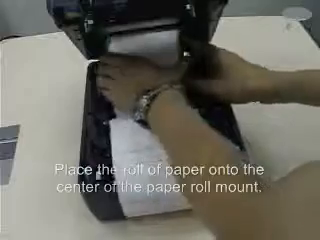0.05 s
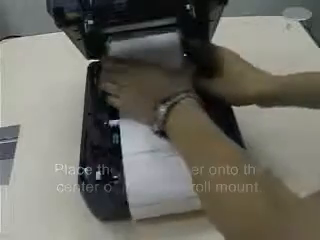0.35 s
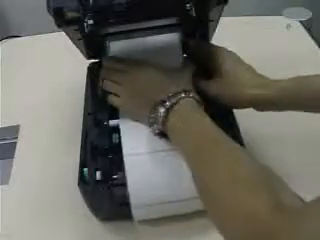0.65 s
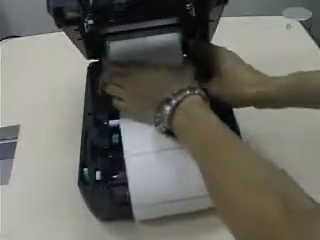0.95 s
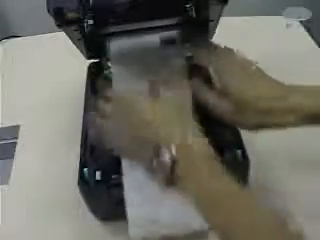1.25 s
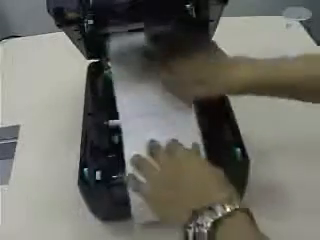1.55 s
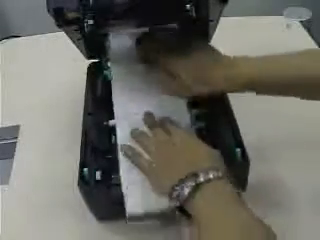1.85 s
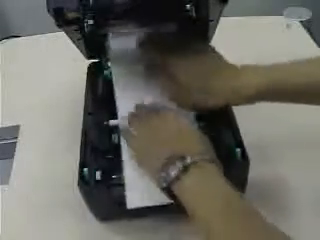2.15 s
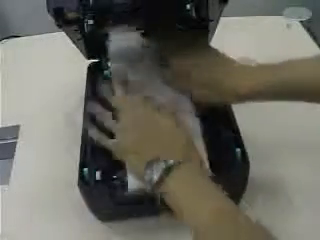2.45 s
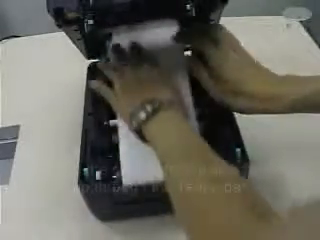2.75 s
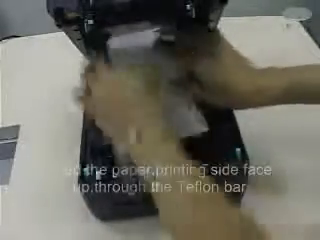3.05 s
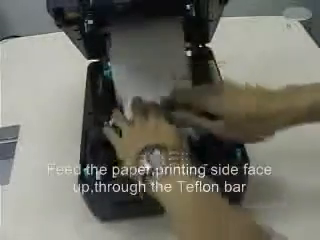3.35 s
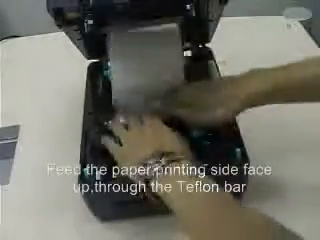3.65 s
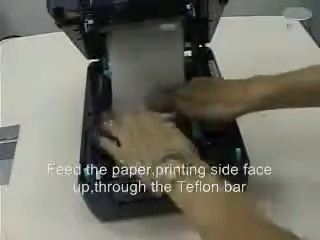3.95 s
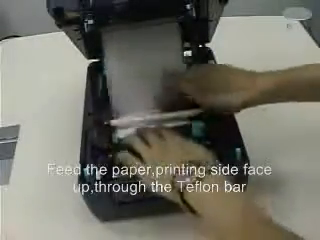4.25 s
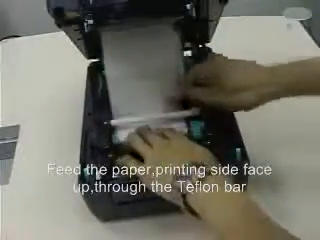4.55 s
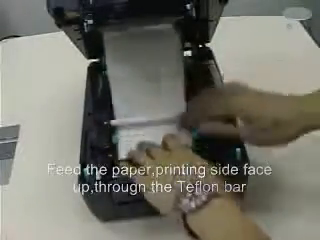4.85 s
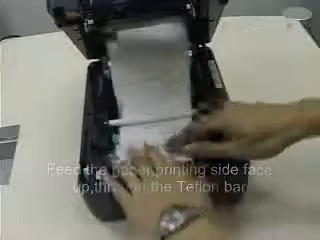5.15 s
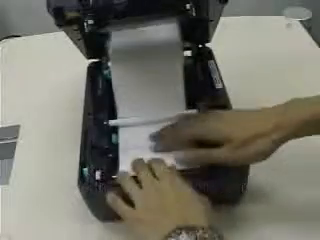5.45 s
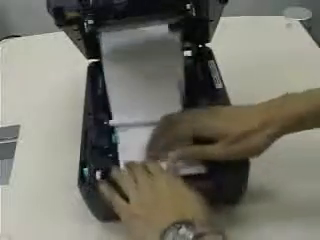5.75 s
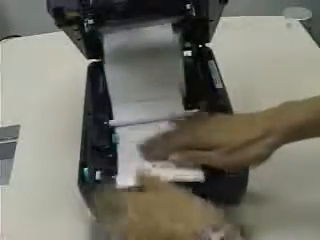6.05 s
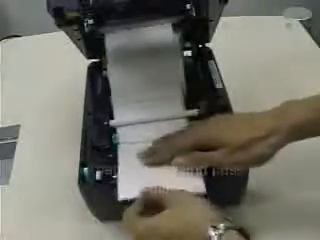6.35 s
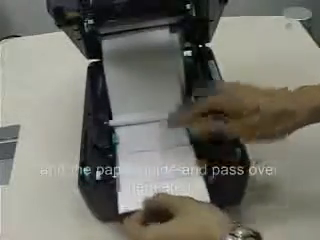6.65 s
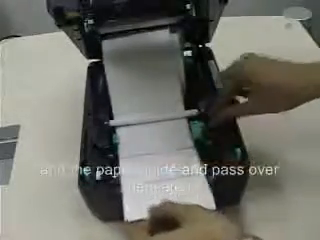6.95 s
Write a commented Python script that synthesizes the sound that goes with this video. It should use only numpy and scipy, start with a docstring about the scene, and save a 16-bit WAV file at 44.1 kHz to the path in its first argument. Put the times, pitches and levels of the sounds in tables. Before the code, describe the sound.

A paper roll clacks into a plastic printer, then paper rustles and slides amid light clicks and hollow knocks.

```python
"""Loading a label printer

At a desk in a small, live room, heard from a camera's two close microphones. A label roll drops into
the printer's plastic mount, which clacks and thumps the desk. Hands pull the paper strip out and feed
it under a bar: fingers and guides click on the hollow case, and the sliding paper rustles.
The room rings behind it all, over ventilation noise."""
import sys
import numpy as np
from scipy import signal
from scipy.fft import rfft, irfft, next_fast_len
from scipy.io import wavfile
from scipy.ndimage import uniform_filter1d

SR = 44100
rng = np.random.default_rng(int(sys.argv[2]) if len(sys.argv) > 2 else 0)


def transcribe(signal):
    """Save signal, clipped to [-1, 1], as a 16-bit WAV file at the path in sys.argv[1]."""
    frames = np.atleast_2d(signal).T
    limited = np.clip(frames, -1, 1)
    pcm = np.round(limited * 32767).astype(np.int16)
    wavfile.write(sys.argv[1], SR, pcm)


N = 308700
TIME = np.arange(N) / SR
BLOW_SAMPLES = SR / 100  # levels of single sounds refer to 10 ms

# The roll lands, rebounds and settles, close to the microphones.
# Each row: start in seconds, level in dB, treble offset in dB, desk thump level in dB.
ROLL_BLOWS = [(.4070, -17.5, -2, -26), (0.4082, -13.5, -5.5, -47.5), (0.428, -27, -2.5, -55.5),
              (0.4395, -10, -17, -18.5), (0.4487, -26, -4.5, -32.5), (0.4609, -19.5, -19.5, -31)]
# The plastic mount. Each row: mode frequency in Hz, relative level in dB, time to fall 60 dB in seconds.
MOUNT_MODES = [(828, -2, 0.019), (1070, 4, 0.0092), (1076, -4.5, 0.14), (1183, -15, .1), (1346, -2, 0.0037),
               (2500, -22, 0.0037), (3530, -3, 0.0052), (3240, -18, 0.028), (5400, -11, 0.00081),
               (6600, -3, 0.0052)]
# The desk under the printer. Each row: mode frequency in Hz, relative level in dB, t60 in seconds.
DESK_MODES = [(60, -9, .12), (83.4, -6, 0.11), (109, 0, 0.19), (148, -2, 0.53), (267, -4, 0.071),
              (330, -3.5, 0.21)]
# The midrange crack of a contact, heard close. Each row: frequency in Hz, relative level in dB.
CRACK_SPECTRUM = [(300, -10), (900, -2), (1500, 6.5), (2900, 5.5), (4200, -11), (9000, -39.5)]
# The bright snap at the mount. Each row: frequency in Hz, relative level in dB.
SNAP_SPECTRUM = [(1500, -13), (3000, -10), (3700, 6.5), (4900, -7), (6800, -3.5), (7800, -7.5), (9500, -41),
                 (11000, -47)]


def roll_drop(case, treble_hz=2000, pan_db=2):
    """The roll clacks into its mount; hard blows wake the high modes, heavy ones thump the desk."""
    out, desk = np.zeros((2, N)), body(DESK_MODES)
    low = body(MOUNT_MODES, below_hz=treble_hz)
    high = body(MOUNT_MODES, from_hz=treble_hz)
    for s, db, treble_db, thump_db in ROLL_BLOWS:
        add(out, s, low, db, pan_db)
        add(out, s - .0004, high, db + treble_db - 3, pan_db=-1)
        add(out, s - .001, colour(contact(.0053), CRACK_SPECTRUM)[0], db + treble_db / 2 - 7)
        add(out, s - .001, colour(contact(.003), SNAP_SPECTRUM)[0], db + treble_db - 6)
        add(out, s, case, db - 13, pan_db)
        add(out, s, desk, thump_db, pan_db=-.8)
    return out


# The hollow case on the desk. Each row: mode frequency in Hz, relative level in dB, t60 in seconds.
CASE_MODES = [(323.4, -4.5, 0.38), (352, -10.5, 0.14), (396.9, -1.5, 0.51), (439, -5, 0.056),
              (480.6, -5.5, 0.26), (508, -0.5, 0.13), (570, -1, 0.017), (617.3, -2.5, 0.14),
              (681, -3.5, 0.041), (817, -2, 0.036), (1002, -7.5, 0.046), (1266, -10, 0.098),
              (1475, -12.5, 0.038)]
# How much of a push gets into the case. Each row: frequency in Hz, relative gain in dB.
CASE_UPTAKE = [(60, -25), (200, -5), (320, 2.5), (9000, 0.5)]


def hollow_case():
    """The case rings in many modes but answers little to the slowest part of a push."""
    return unit(colour(body(CASE_MODES), CASE_UPTAKE)[0])


# Fingers, guides and paper edges strike the case, just left of centre. Each row: start in seconds,
# contact length in seconds, ring in Hz, then relative levels in dB of ring and crack, tick, case knock.
CASE_CONTACTS = [(0.067, 0.0019, 4280, -38.5, -29, -57), (1.161, .0022, 1160, -47.5, -53, -55),
                 (1.182, 0.018, 1104, -36, -46.5, -35), (1.229, 0.0052, 1310, -37, -57.5, -55.5),
                 (1.2378, .003, 2040, -29.5, -39, -45), (1.8595, 0.0046, 1400, -30, -27.5, -30),
                 (2.19, 0.0044, 1250, -37, -41.5, -30), (2.216, .002, 1830, -37.5, -43.5, -33.5),
                 (2.269, 0.0041, 2980, -34, -35, -58), (2.745, 0.0053, 2100, -41.5, -48, -55.5),
                 (2.819, .003, 7850, -46, -43, -55), (2.831, .0089, 2420, -41.5, -39.5, -56),
                 (3.038, 0.0016, 7840, -46, -42, -52), (3.077, 0.0021, 1580, -41, -62, -38),
                 (3.12, 0.0019, 2340, -45.5, -60, -28.5), (3.201, .009, 1990, -30.5, -32, -36.5),
                 (3.2074, .004, 1880, -28.5, -35.5, -24), (3.285, 0.007, 2380, -42.5, -34, -70),
                 (3.3298, 0.0026, 2410, -29, -36.5, -45), (3.3575, 0.0014, 1900, -40, -39, -42),
                 (3.4927, 0.0026, 2020, -33, -44, -30), (3.511, 0.007, 1413, -24, -37, -18.5),
                 (3.5187, 0.0036, 920, -28.5, -43.5, -33.5), (3.5897, 0.0012, 1670, -33, -38.5, -25),
                 (4.282, 0.007, 2250, -46.5, -50, -53), (4.401, .0025, 2900, -54, -52, -58),
                 (4.46, .0066, 2080, -39.5, -34, -29), (4.5492, .003, 2440, -45, -35, -35),
                 (4.643, 0.0044, 2340, -34.5, -30.5, -35), (4.7213, .003, 900, -37.5, -32.5, -35.5),
                 (4.905, 0.0019, 1970, -55, -45, -47.5), (5.03, 0.012, 1930, -31.5, -42.5, -32.5),
                 (5.0625, 0.011, 1346, -23.5, -36.5, -21.5), (5.076, 0.0048, 916, -28.5, -50, -18),
                 (5.185, 0.007, 4960, -29, -25, -24.5), (5.2472, .0028, 2020, -32, -37.5, -29),
                 (5.268, .002, 5700, -31, -28, -49), (5.349, 0.0045, 2420, -45.5, -35, -35.5),
                 (5.3826, 0.0012, 3700, -30, -31, -37), (5.388, 0.0094, 3940, -36.5, -31.5, -47),
                 (5.4182, 0.00072, 5200, -36, -33, -30), (5.628, .0049, 2740, -47, -53.5, -33.5),
                 (5.8016, 0.0039, 930, -43, -38.5, -31.5), (6.009, .0011, 6930, -52, -51, -57),
                 (6.049, 0.0013, 1430, -45, -50, -42), (6.06, .008, 990, -50, -47, -29),
                 (6.0917, 0.00082, 4600, -38.5, -28, -55), (6.2143, 0.0046, 1740, -43.5, -43, -42),
                 (6.7143, 0.00065, 4160, -44, -41, -44.5)]
# A small, sharp tick near the microphones. Each row: frequency in Hz, relative level in dB.
TICK_SPECTRUM = [(1500, -11), (3000, -6), (3900, -1), (6500, -1.5), (8000, -4.5), (9500, -16.5),
                 (11000, -33)]


def clicks(case, ring_cycles=17, lead_s=.0004, pan_db=1.6):
    """Each contact cracks, rings a small plastic part for a few cycles and knocks on the case."""
    rings, cracks, ticks, knocks = np.zeros((4, 2, N))
    for s, length, hz, db, tick_db, knock_db in CASE_CONTACTS:
        touch = contact(length)
        part = ring(hz, ring_cycles / hz, size=512)
        add(rings, s - lead_s, unit(np.convolve(touch, part)), db + 1, pan_db)
        add(cracks, s - lead_s, touch, db - 3, pan_db)
        add(ticks, s - lead_s, contact(length), tick_db - 3, pan_db / 2)
        add(knocks, s, unit(through(touch, case)[0]), knock_db - 1, pan_db)
    return rings + colour(cracks, CRACK_SPECTRUM) + colour(ticks, TICK_SPECTRUM) + knocks


# The hollow ring of the heavier knocks, a little toward the left microphone.
# Each row: start in seconds, pitch in Hz, relative level in dB.
CASE_THUDS = [(1.2417, 557, -31), (3.209, 519, -30), (3.404, 394, -37), (3.5155, 534, -22.5),
              (3.777, 520, -31), (4.464, 352, -33.5), (5.0655, 593, -24), (5.0752, 530, -23),
              (5.348, 408, -26.5), (5.52, 393, -35), (6.061, 823, -33.5), (6.105, 336, -30.5)]


def thuds(ring_cycles=60):
    """The heavier knocks also ring the case with one hollow note; lower notes last longer."""
    out = np.zeros((2, N))
    for s, hz, db in CASE_THUDS:
        add(out, s, ring(hz, ring_cycles / hz), db, pan_db=2.5)
    return colour(out, CASE_UPTAKE)


# Hands slide the paper through the printer. Each row: middle of the swell in seconds, time from there
# to the fade in seconds, then relative levels in dB of rustle, edge hiss, drag on the case.
HAND_STROKES = [(0, 0.01, -45.5, -45.5, -40), (.06, 0.42, -55, -61, -65), (1.196, 0.047, -42.5, -48, -39.5),
                (1.488, 0.077, -39, -41.5, -52), (1.563, .09, -40, -42, -54), (1.765, 0.13, -49, -49, -63),
                (1.85, 0.11, -39, -39.5, -46), (2.09, 0.13, -49, -54.5, -59), (2.2, 0.091, -41, -46, -51),
                (2.298, 0.077, -42, -44, -54), (2.433, 0.016, -39.5, -45, -59), (2.536, .05, -60, -52, -62),
                (2.709, 0.24, -46.5, -46.5, -50), (2.981, 0.16, -42.5, -44, -44),
                (3.13, 0.098, -39.5, -48.5, -32.5), (3.307, 0.13, -44, -50, -36),
                (3.495, .13, -38, -46.5, -35), (3.71, 0.058, -36, -40.5, -36.5),
                (3.84, 0.072, -59, -65, -44.5), (3.94, 0.13, -49.5, -53.5, -58),
                (4.164, 0.5, -55, -59.5, -56.5), (4.463, 0.068, -40, -48, -35),
                (4.69, 0.072, -49, -47, -40.5), (4.824, 0.29, -50.5, -54, -48.5),
                (5.079, 0.079, -35, -52.5, -36), (5.184, 0.23, -39.5, -44.5, -37.5),
                (5.484, 0.14, -51, -54.5, -47.5), (5.797, 0.084, -40.5, -45.5, -37),
                (6.076, 0.034, -38.5, -37.5, -29), (6.206, 0.24, -52.5, -55.5, -45.5),
                (6.499, 0.025, -45, -45.5, -37), (6.612, .06, -51.5, -56.5, -45.5),
                (6.791, 0.038, -53.5, -53.5, -53)]


def stroke_levels(attack_s=.1, sag_db_per_s=7.5, release_s=.057):
    """Rustle, hiss and drag over time: each stroke gathers speed, slackens slightly and dies away."""
    power = np.zeros((3, N))
    for s, length, *levels_db in HAND_STROKES:
        i = max(int((s - attack_s / 2) * SR), 0)
        t = TIME[i:i + SR] - s
        attack = np.sin(np.pi / 2 * np.clip(t / attack_s + .5, 0, 1)) ** 2
        release = np.exp(-np.maximum(t - length, 0) / release_s)
        envelope = attack * undb(-sag_db_per_s * t) * release
        power[:, i:i + len(t)] += np.outer(undb(levels_db), envelope) ** 2
    return np.sqrt(power)


# The face of the strip, heard close. Each row: frequency in Hz, relative level in dB.
RUSTLE_SPECTRUM = [(200, -22), (600, -4.5), (1000, 1.5), (1500, 2.5), (2100, 2), (3000, -2), (4500, -10.5),
                   (9000, -37.5)]
# Its edge, equal in both microphones. Each row: frequency in Hz, relative level in dB.
EDGE_SPECTRUM = [(1200, -22), (2800, -1.5), (4000, 0.5), (5500, 0.5), (7000, -1.5), (8500, -3.5),
                 (10000, -20), (11000, -36.5)]
# The low rub of hands at the printer. Each row: frequency in Hz, relative level in dB.
RUB_SPECTRUM = [(40, -47.5), (90, -17), (190, -7), (330, 2.5), (520, 1.5), (750, -7.5), (1000, -6.5),
                (2000, -41)]


def sliding_paper(case, jerk_db=3):
    """The strip slides in small jerks: it rustles, its edge hisses, and the drag rumbles in the case."""
    rustle, hiss, drag = stroke_levels() * undb(jerk_db * np.tanh(wander(70)))
    paper = colour(rustle * fibres(per_s=1200, spread_db=5.5, smooth_db=4.5), RUSTLE_SPECTRUM)
    edge = colour(hiss * fibres(per_s=2200, spread_db=2.5, smooth_db=.5), EDGE_SPECTRUM)
    rumble = undb(-4) * through(drag * fibres(per_s=300, spread_db=3, smooth_db=-6.5), case)
    hands = undb(-4) * colour(drag * rng.standard_normal(N), RUB_SPECTRUM)
    return (paper + rumble + hands) * pan(.4) + edge + crinkles(hiss)


def fibres(per_s, spread_db, smooth_db, count=30000):
    """Paper fibres catch and slip: tiny clicks of uneven size over smooth friction noise."""
    when, size, chance, sign = rng.random((count, 4)).T
    strength = undb(spread_db * np.minimum(-np.log(1 - size), 4)) * np.sign(sign - .5)
    slipping = chance < per_s * N / SR / count
    slips = np.bincount((when * N).astype(int), strength * slipping, N)
    friction = slips / slips.std() + undb(smooth_db) * rng.standard_normal(N)
    return friction / friction.std()


def crinkles(hiss, spread_db=3, count=28):
    """The moving strip buckles now and then with a faint tick, louder when it slides faster."""
    out = np.zeros((2, N))
    for when, size in rng.random((count, 2)):
        i = int(when * N)
        hiss_db = 20 * np.log10(hiss[i] + 1e-9)
        add(out, TIME[i], contact(.0016), hiss_db - 3 + spread_db * (2 * size - 1))
    return colour(out, TICK_SPECTRUM)


# Skin and paper edges scrape, half-pitched, midway between the microphones.
# Each row: start in seconds, length in seconds, resonance in Hz, relative level in dB.
STRIP_SCRAPES = [(0.363, 0.042, 1160, -33.5), (1.679, 0.12, 1540, -49), (2.322, 0.052, 5600, -41),
                 (2.507, 0.14, 2030, -52.5), (2.717, .26, 2010, -44.5), (3.952, 0.17, 1980, -50),
                 (4.162, 0.062, 1730, -48.5), (4.966, 0.041, 1830, -44.5), (6.336, 0.089, 1790, -44),
                 (6.495, 0.025, 1970, -42)]


def scrapes(ring_cycles=13):
    """Short stick-slip strokes excite one resonance of the stretched strip."""
    out, t = np.zeros((2, N)), TIME[:SR // 2]
    for s, length, hz, db in STRIP_SCRAPES:
        arch = np.sin(np.pi * np.minimum(t / length, 1))
        friction = np.sqrt(np.maximum(arch, 0)) * rng.standard_normal(len(t))
        scrape = through(friction, ring(hz, ring_cycles / hz, size=1024))[0]
        length_db = 10 * np.log10(length * SR / BLOW_SAMPLES)  # longer strokes carry more energy
        add(out, s, unit(scrape), db - 1 + length_db)
    return out


# The small room around the desk. Each row: frequency in Hz, reverberation time in seconds.
ROOM_DECAY = [(100, 0.3), (400, 0.83), (1000, 0.48), (3000, 0.76), (8000, 0.29)]
# Its tail, heard from beside the printer. Each row: frequency in Hz, gain against the direct sound in dB.
TAIL_LEVEL = [(100, -4.5), (400, -2.5), (1000, -5.5), (3000, -7), (8000, -9)]
# The tail's width across the microphones. Each row: frequency in Hz, side minus mid in dB.
TAIL_WIDTH = [(100, -8), (500, -8.5), (1500, -7), (4000, -5.5), (8000, -22.5)]


def room(direct, first_echo_s=.0013, build_s=.00058):
    """Direct sound and a dense tail from the walls, shortest in the deep bass and the top treble."""
    t = TIME[:SR]
    mid, side = rfft(rng.standard_normal((2, SR)))
    hz = np.maximum(np.arange(SR // 2 + 1), 64)
    spectrum = stereo(mid, side, along(TAIL_WIDTH, hz))
    onset = 1 - np.exp(-np.maximum(t - first_echo_s, 0) / build_s)
    tail = np.zeros((2, SR))
    for octave in range(6, 15):  # 64 Hz to 16 kHz
        band = irfft(spectrum * np.maximum(1 - abs(np.log2(hz) - octave), 0), SR)
        fade = unit(onset * np.exp(-np.log(1000) * t / along(ROOM_DECAY, 2 ** octave)))
        tail += undb(along(TAIL_LEVEL, 2 ** octave)) * band * fade
    return direct + through(direct, tail)


# Ventilation filling the room, heard at the desk. Each row: frequency in Hz, relative level in dB.
VENT_SPECTRUM = [(20, -17.5), (55, -2), (100, -4.5), (200, 0), (330, 0.5), (500, -5), (800, -12),
                 (1500, -17.5), (3000, -21), (6000, -28), (8000, -25), (10000, -40.5)]


def ventilation(air_db=-46, waver_db=3.5, draught_db=-68):
    """Diffuse air noise wavers slightly; a faint draught rumbles on each microphone alone."""
    mid, side = rng.standard_normal((2, N))
    air = colour(stereo(mid, side, width_db=-6.5), VENT_SPECTRUM)
    draught_spectrum = [(25, -5), (55, -4), (120, -16.5), (500, -56)]
    draught = colour(rng.standard_normal((2, N)), draught_spectrum, size=8192)
    level = undb(air_db + waver_db * np.tanh(wander(4.1)))
    return level * air / air.std() + undb(draught_db) * draught


def contact(length_s, size=1024):
    """A brief chatter of micro-impacts with an even spectrum."""
    t = TIME[:size] / length_s
    envelope = t * np.exp(-2.05 * t)
    burst = rng.standard_normal(size) * envelope
    for _ in range(2):  # flatten the spectrum, then restore the envelope
        burst = irfft(np.exp(1j * np.angle(rfft(burst)))) * envelope
    return unit(burst)


def ring(hz, t60, size=16384):
    """One struck mode of unit energy."""
    t = TIME[:size]
    return unit(np.sin(2 * np.pi * hz * t) * np.exp(-np.log(1000) * t / t60))


def body(modes, from_hz=0, below_hz=np.inf):
    """A struck object's modes within a range; neighbours swing in opposite senses."""
    return unit(sum((-1) ** k * undb(db) * ring(hz, t60)
                    for k, (hz, db, t60) in enumerate(modes) if from_hz <= hz < below_hz))


def wander(rate_hz):
    """Random drift with a spread of 1."""
    step = int(SR / rate_hz)
    held = np.repeat(rng.standard_normal(N // step + 1), step)[:N]
    drift = uniform_filter1d(held, step)
    return drift / drift.std()


def colour(x, points, size=2048):
    """Minimum-phase filter through (Hz, dB) points; white noise keeps its power."""
    gain = undb(along(points, np.arange(size // 2 + 1) * SR / size))
    cepstrum = irfft(np.log(gain / np.sqrt(np.mean(gain ** 2))))
    cepstrum[1:size // 2] *= 2
    cepstrum[size // 2 + 1:] = 0
    return through(x, irfft(np.exp(rfft(cepstrum))))


def through(x, response):
    """Convolve every channel with a response."""
    x, response = (np.atleast_2d(v).astype(np.float32) for v in (x, response))
    size = next_fast_len(x.shape[1] + response.shape[1], True)
    return irfft(rfft(x, size) * rfft(response, size), size)[:, :N]


def add(track, s, sound, db, pan_db=0):
    """Place a unit-energy sound at s seconds; db is its rms as if it lasted 10 ms."""
    i = max(int(s * SR), 0)
    sound = sound[:N - i] * np.sqrt(BLOW_SAMPLES)
    track[:, i:i + len(sound)] += undb(db) * pan(pan_db) * sound


def pan(db):
    """Gains at the two microphones; db is left minus right."""
    return undb([[db / 2], [-db / 2]])


def stereo(mid, side, width_db):
    """Left and right from a shared part and a weaker difference."""
    return mid + undb(width_db) * side * np.array([[1], [-1]])


def along(points, hz):
    """Read (Hz, value) points on a log-frequency axis."""
    f, value = np.transpose(points)
    return np.interp(np.log(hz + 1), np.log(f), value)


def unit(x):
    """Scale to unit energy."""
    return x / np.sqrt(np.sum(x ** 2) + 1e-18)


def undb(db):
    """Decibels to amplitude."""
    return 10 ** (np.asarray(db) / 20)


def scene():
    """Everything on the printer sounds in the room, over the ventilation."""
    case = hollow_case()
    printer = roll_drop(case) + clicks(case) + thuds() + scrapes() + sliding_paper(case)
    return room(printer) + ventilation()


def record(dry, roll_off_hz=9400, ceiling=.96, top_hz=10500):
    """The camera dulls the highest treble, rounds the loudest peaks and cuts the top."""
    dulled = signal.sosfilt(signal.butter(8, roll_off_hz, fs=SR, output="sos"), dry)
    rounded = dulled / (1 + (dulled / ceiling) ** 6) ** (1 / 6)
    return signal.sosfiltfilt(signal.ellip(8, .05, 55, top_hz, fs=SR, output="sos"), rounded)


dry = scene()
out = record(dry)
transcribe(out)
```